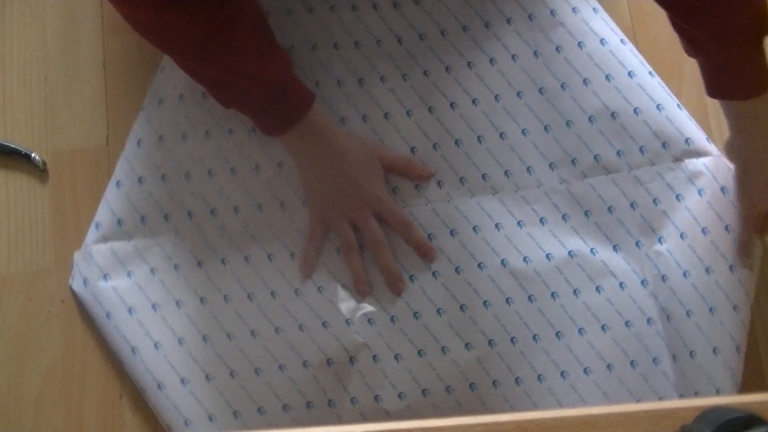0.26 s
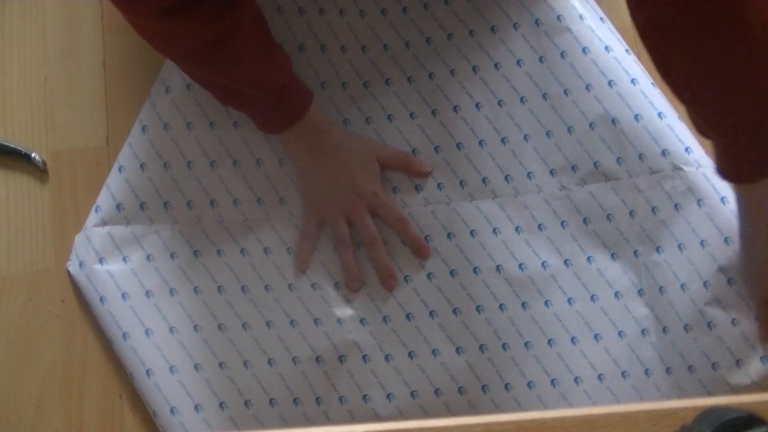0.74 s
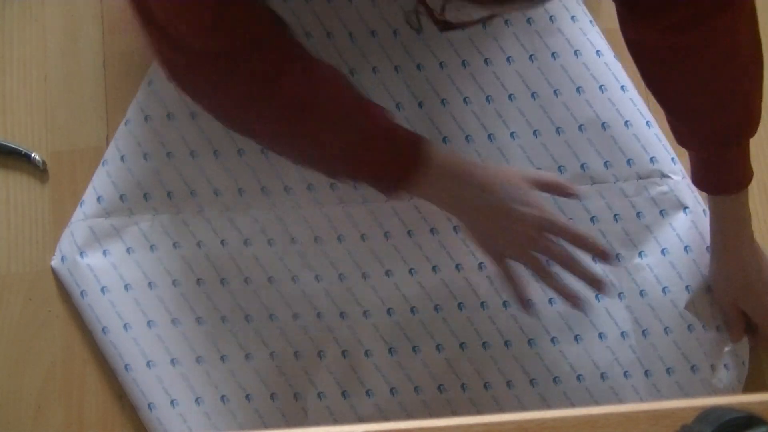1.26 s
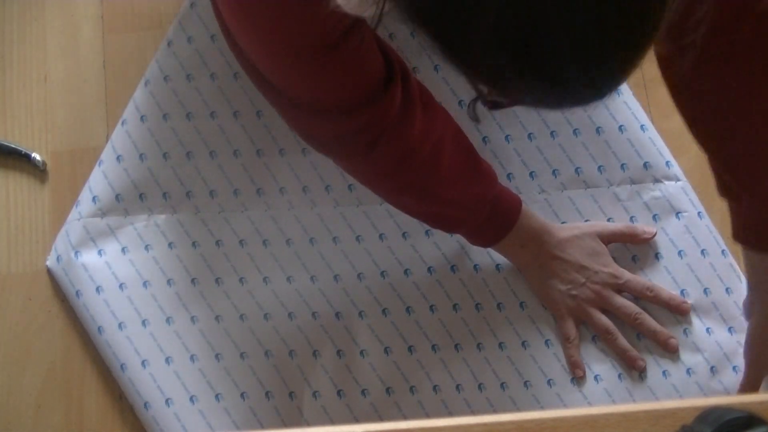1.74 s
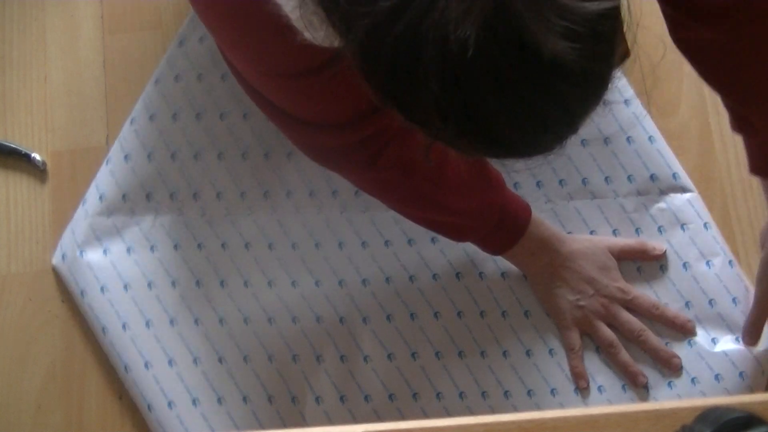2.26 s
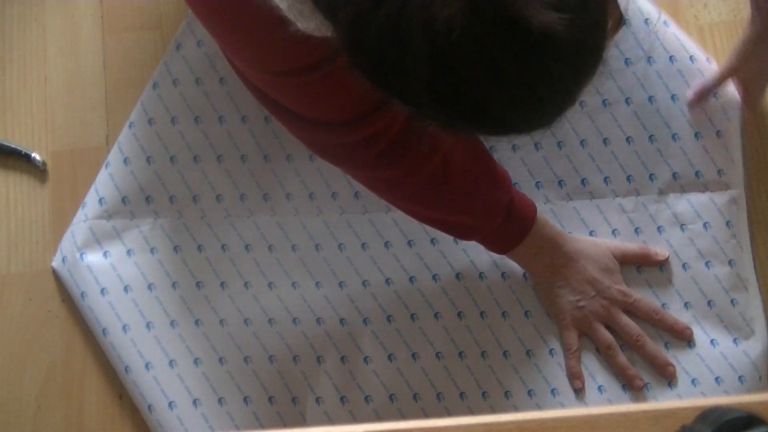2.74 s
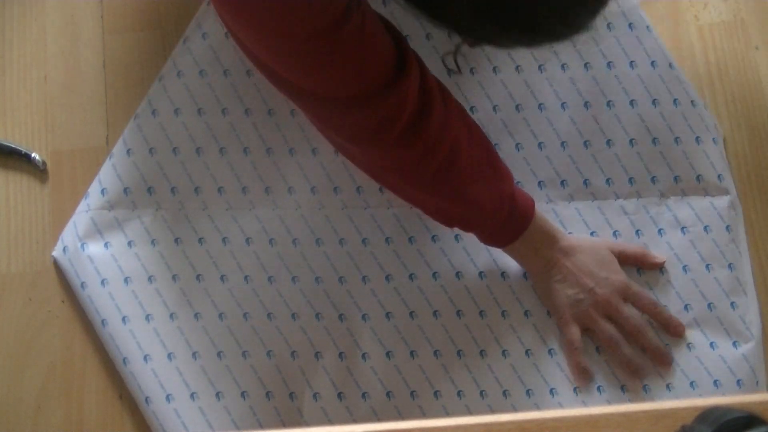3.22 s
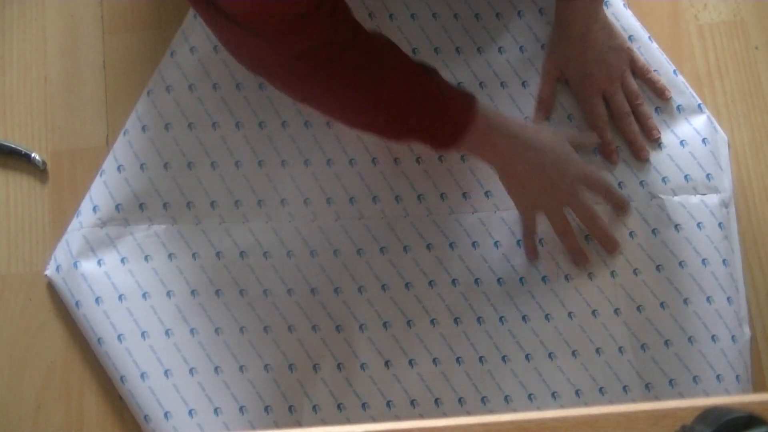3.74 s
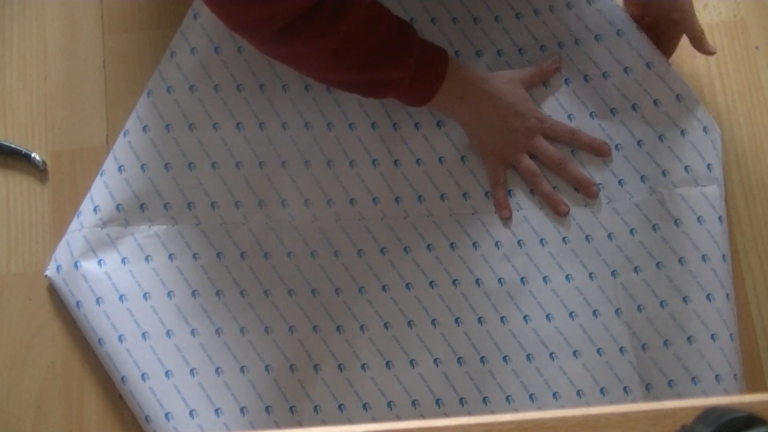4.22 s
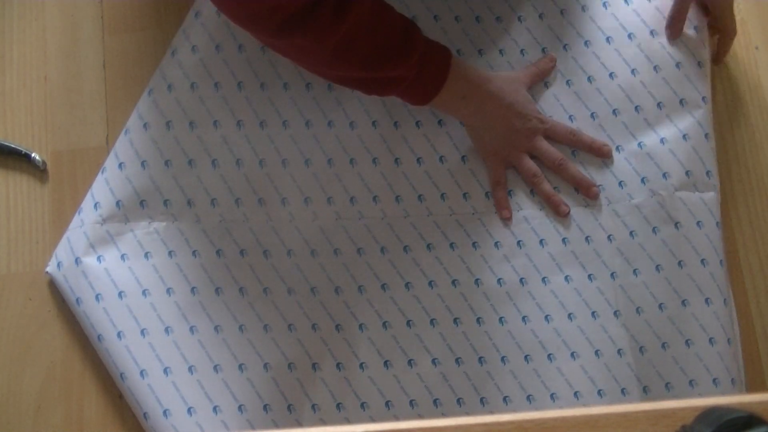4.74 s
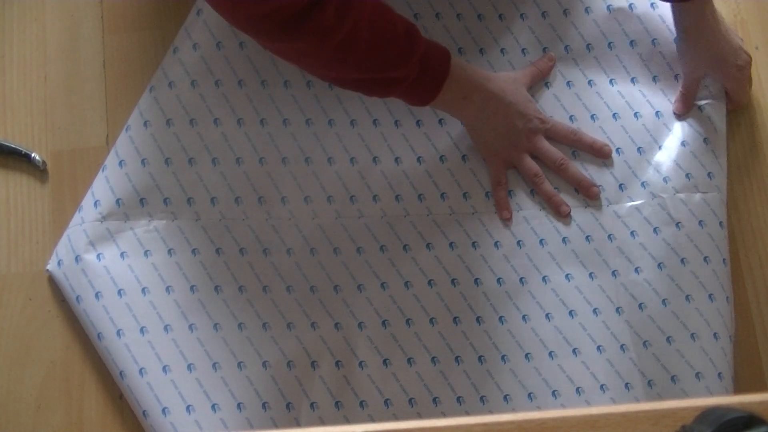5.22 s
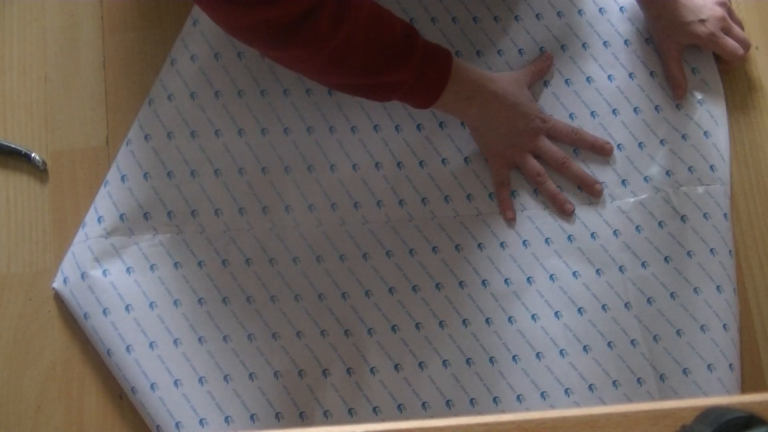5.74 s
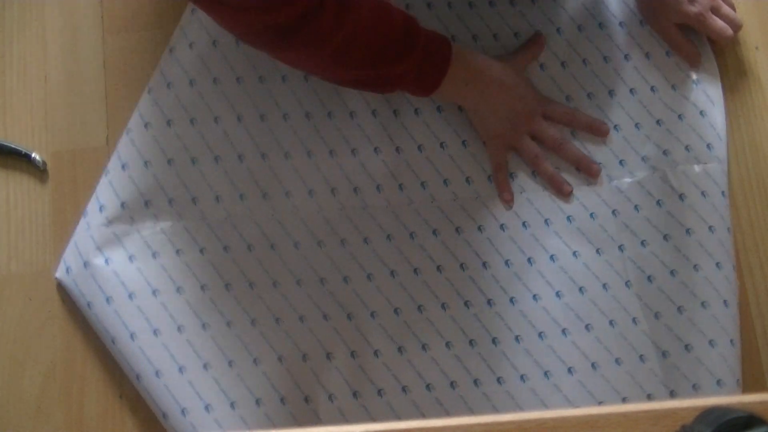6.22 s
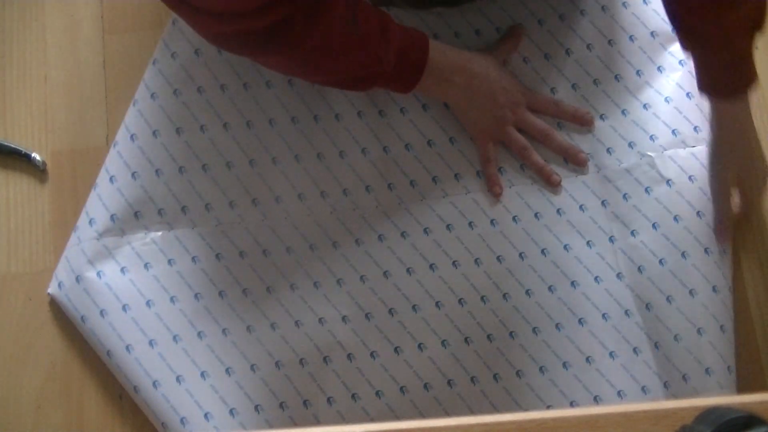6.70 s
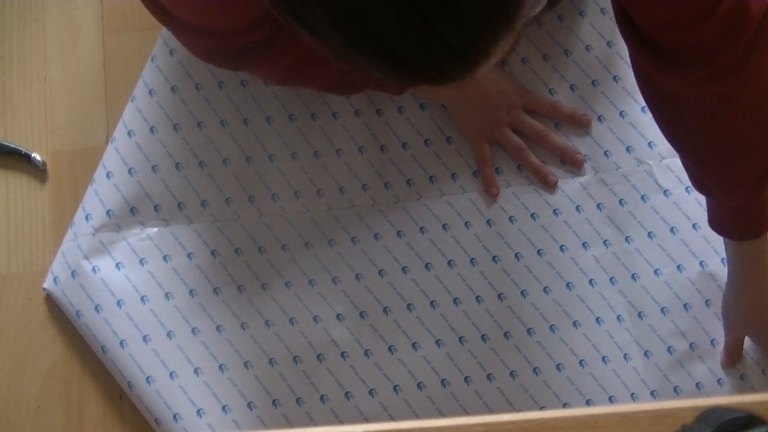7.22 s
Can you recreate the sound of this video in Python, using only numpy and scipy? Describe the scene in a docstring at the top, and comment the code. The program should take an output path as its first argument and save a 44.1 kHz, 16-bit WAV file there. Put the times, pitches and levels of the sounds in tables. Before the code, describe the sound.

Hands slide a large sheet of stiff paper over a wooden floor in uneven, hissing strokes. Creases snap and crackle, and palms pat it flat with hollow pops, the sharpest about three seconds in. A little later the edge rasps loudly over the floor with a brief honk of squeezed air. Near the end the floor thumps dully under more rustling. It is heard from nearby in a small, quiet room.

```python
"""A large sheet of stiff cover paper hisses as hands slide it over a wooden floor and fold it round a
canvas, in a small room. Its fibres catch and let go, creases snap and crackle, palms pat it flat with
hollow pops, and skin squeaks on it once. The edge rasps over the floor, once loudly, while air squeezed
from under the fold honks. Near the end, shifting weight makes the floor thump dully."""
import sys
import numpy as np
from scipy import signal
from scipy.fft import rfft, irfft, next_fast_len
from scipy.io import wavfile
from scipy.ndimage import uniform_filter1d

SR = 44100
rng = np.random.default_rng(int(sys.argv[2]) if len(sys.argv) > 2 else 0)


def generate_wav(signal):
    """Clip the signal to [-1, 1] and save it as 16-bit WAV at the path in sys.argv[1]."""
    frames = np.transpose(np.atleast_2d(signal))
    scaled = np.clip(frames, -1, 1) * 32767
    pcm = np.round(scaled).astype(np.int16)
    wavfile.write(sys.argv[1], SR, pcm)


N = 328986
PUSH_SHAPE = 1.39  # flanks of a push or heave: 1 pointed, 2 rounded
# Stereo width of the room. Each row: frequency in Hz, relative side level in dB.
ROOM_WIDTH = [(60, -2), (250, 4.5), (600, -6.5), (2000, -7.5), (4500, -10), (8000, -3.5), (12000, -0.5)]


def sliding(rub_gain, hiss_gain, flex_gain):
    """Fibres catch and let go; pressure adds fine hiss, bending a hollow body, and tiny wrinkles tick."""
    # Colours of the rub, the hiss and the flexing body. Each row: frequency in Hz, level in dB.
    rub_colour = [(700, -30.5), (1400, -14), (2200, -4), (3000, -3.5), (3800, 0.5), (5000, 3), (5700, -5),
                  (7000, -23), (9000, -30), (14000, -57)]
    hiss_colour = [(4000, -42), (6000, 3.5), (7500, -3), (9800, -5), (11000, -12), (13000, -21),
                   (15800, -26)]
    flex_colour = [(100, -41), (350, -9.5), (560, -13), (750, -2), (1050, 1.5), (1500, 0), (2200, -0.5),
                   (4000, -24)]
    rub = rub_gain * friction(rub_colour, per_s=3200, spread_db=5.5)
    hiss = hiss_gain * friction(hiss_colour, per_s=7000, spread_db=6)
    flex = flex_gain * friction(flex_colour, per_s=900, spread_db=4.5)
    wrinkles = signal.fftconvolve(slips(per_s=110, spread_db=4), crease_click(softness=1))[:N]
    ticks = rub_gain * amp(-13) * unit(in_room(wrinkles, wet_db=-2))
    return rub + hiss + flex + ticks


def hand_motion():
    """Gains of rub, hiss and flex: the pushes of the hands add up in power, over a faint creep."""
    # Pushes on the sheet. Each row: fastest moment, rise and fall in seconds, rub level in dB,
    # extra hiss from pressure in dB, extra body from bending in dB.
    pushes = [(.04, 0.15, 0.051, -39.5, -2.5, 0.5), (.18, 0.097, 0.044, -40, -2, 0),
              (.31, 0.037, 0.084, -37.5, -0.5, -0.5), (.465, 0.14, .15, -35.5, 0, -2),
              (.725, 0.14, 0.059, -40, 0.5, 3), (.93, 0.2, 0.098, -36, -5.5, 4),
              (1.05, 0.034, 0.036, -45.5, 1, 4), (1.42, 0.13, 0.12, -44.5, -4, 1.5),
              (1.528, 0.012, 0.047, -31, -1, 4), (1.89, .34, 0.098, -41, 5, -4.5),
              (2.08, 0.13, 0.08, -39.5, 2, -3), (2.325, 0.088, 0.085, -34.5, 5.5, 2),
              (2.699, 0.48, 0.45, -30.5, -0.5, -6), (2.97, 0.1, 0.043, -53, 17, -13),
              (3.25, 0.15, 0.079, -38, -2, 1), (3.465, 0.016, 0.12, -36, -2, 0.5),
              (3.6, 0.076, 0.035, -40, -4, 0), (3.88, 0.2, 0.14, -46, 2.5, -9),
              (4.03, 0.14, 0.085, -43, -1, 4), (4.2, 0.043, 0.063, -40.5, -0.5, 7.5),
              (4.336, 0.023, 0.059, -28.5, -2.5, -2.5), (4.725, 0.087, 0.049, -42.5, -3, 6),
              (4.96, .1, 0.1, -38, 2, -4), (5.075, 0.07, 0.11, -36, -0.5, -7),
              (5.4, 0.17, 0.19, -40.5, 0.5, 0), (5.755, 0.019, 0.056, -45.5, 3, -11),
              (5.895, 0.066, 0.068, -42, -1, 2), (6.025, 0.025, .04, -43, -10, 6.5),
              (6.125, 0.13, 0.063, -35.5, -1.5, -3), (6.33, 0.089, .17, -39.5, -6, -2.5),
              (6.65, 0.33, 0.26, -37.5, 0.5, 0), (6.85, 0.21, 0.25, -39.5, 3, -6.5),
              (7.1, 0.022, 0.042, -47.5, 6, 16), (7.22, 0.043, 0.12, -43, 3, -3)]
    # The hands hold the sheet still. Each row: centre in seconds, half length in seconds.
    rests = [(3.82, 0.076), (5.723, 0.45), (7.42, 0.14)]
    hiss_db, flex_db = -10.5, -7  # against the rub
    flex_linger = 1.2  # bending dies away more slowly than sliding
    creep = 1 - sum(swell(at, half, half, shape=1) for at, half in rests)
    rub, hiss, flex = np.outer(amp([-57.5, -68, -50]), creep) ** 2
    for at, rise, fall, db, pressure_db, bend_db in pushes:
        speed = amp(db) * swell(at, rise, fall, PUSH_SHAPE)
        bend = amp(db + flex_db + bend_db) * swell(at, rise, fall * flex_linger, PUSH_SHAPE)
        rub += speed ** 2
        hiss += (amp(hiss_db + pressure_db) * speed) ** 2
        flex += bend ** 2
    return np.sqrt([rub, hiss, flex])


def billowing(flex_gain):
    """Soft flaps of the sheet: in a bending wave the highs arrive first, so each flap sweeps down."""
    # The whole sheet heaves. Each row: strongest moment, rise and fall in seconds, level in dB.
    heaves = [(.18, 0.065, 0.091, -46), (1.42, 0.026, 0.057, -48), (2.22, .22, 0.34, -51),
              (3.51, 0.097, 0.14, -48), (4.08, .06, 0.042, -56), (4.5, 0.12, .06, -44.5),
              (6.08, 0.12, 0.12, -53.5), (6.5, 0.061, 0.081, -51)]
    # Colour of the swaying sheet. Each row: frequency in Hz, level in dB.
    sway_colour = [(20, -50), (45, -22), (70, -25), (105, -1.5), (170, -10.5), (300, -7.5), (480, -3.5),
                   (800, 7.5), (2000, -53)]
    t = np.arange(SR // 25) / SR
    sweep_hz = 90 + 650 * np.exp(-t / 0.00482)
    flap = np.sin(2 * np.pi * np.cumsum(sweep_hz) / SR) * np.exp(-t / 0.012)
    flaps = signal.fftconvolve(slips(per_s=90, spread_db=8), flap)[:N]
    heaving = sum(amp(db) * swell(at, rise, fall, PUSH_SHAPE) for at, rise, fall, db in heaves)
    bending = amp(-59) * unit(flex_gain) ** 0.48  # grows 0.48 dB for each dB of flex
    return np.hypot(bending, heaving) * unit(in_room(coloured(flaps, sway_colour), wet_db=0.5))


def edge_scraping():
    """The edge of the sheet rasps as it is dragged over the floor."""
    # Drags of the edge. Each row: fastest moment, rise and fall in seconds, level in dB.
    drags = [(4.344, 0.084, 0.028, -43.5), (4.524, 0.05, .054, -19.5), (5.2, 0.13, 0.17, -48.5),
             (5.567, 0.045, 0.041, -35)]
    # Colour of the rasp. Each row: frequency in Hz, level in dB.
    rasp_colour = [(60, -29), (300, -22), (520, 0), (650, -1.5), (1200, 7), (2300, 5), (3000, -3),
                   (3700, 2.5), (5100, 4.5), (6200, -6), (8000, -19), (10500, -18.5), (15800, -36)]
    speed = sum(amp(db) * swell(at, rise, fall, shape=1.18) for at, rise, fall, db in drags)
    return speed * friction(rasp_colour, per_s=2200, spread_db=4)


def pocket_honks(width_hz=165):
    """Air squeezed from under a fold honks: uneven slips drive one resonance of each pocket."""
    # Air pockets. Each row: strongest moment, rise and fall in seconds, level in dB, resonance in Hz.
    pockets = [(4.335, 0.018, 0.09, -38.5, 1207), (4.425, 0.0092, 0.013, -41, 767),
               (4.494, 0.025, .017, -26, 790), (4.533, 0.011, 0.015, -12.5, 1219),
               (4.57, 0.061, 0.021, -26, 1338), (5.07, 0.21, .11, -50.5, 871),
               (6.59, 0.018, .05, -41.5, 801), (6.78, 0.18, 0.38, -55.5, 808),
               (7.016, 0.029, 0.035, -42.5, 850), (7.115, 0.013, 0.019, -37, 850)]
    lowpass = signal.butter(3, width_hz / 2, fs=SR, output="sos")
    honks, t = np.zeros(N), np.arange(N) / SR
    for at, rise, fall, db, hz in pockets:
        drive = slips(per_s=800, spread_db=1) + 1j * slips(per_s=1100, spread_db=7)
        wobble = signal.sosfilt(lowpass, drive)
        tone = unit(np.real(wobble * np.exp(2j * np.pi * hz * t)))
        honks += amp(db) * swell(at, rise, fall, shape=1.3) * tone
    return in_room(honks, wet_db=-12)


def crease_snaps():
    """A crease flips in a burst of clicks and sets off a dying crackle; a hard flip shoves the air."""
    # Snapping creases. Each row: start in seconds, level in dB, crackle trim in dB, softness (0 is hard).
    snaps = [(0.202, -22.5, -7, 0.77), (0.7023, -24, -5, 1.2), (.859, -16.5, -13, 1.5),
             (0.9364, -15.5, -25, 1.1), (1.522, -25, -4, 0.95), (2.19, -27.5, -0.5, 0.78),
             (3.046, -23.5, 6, 1.4), (3.0613, 0, -10.5, 0.022), (3.449, -15, -28, 1.26),
             (3.4802, -26.5, -18, 1.07), (3.8916, -34, -5, 0.67), (4.1019, -31, 2, 0),
             (4.191, -25, -5, 1.2), (4.489, -11, -13, 0.81), (4.6581, -16.5, -16, 1.15),
             (4.6754, -10.5, -18, 0.4), (4.7509, -24, -24, 0.68), (5.3688, -32.5, 0, 1.6),
             (5.888, -27.5, -3, 1.5), (6.1378, -20, -17, 0.79), (6.846, -22, -7.5, 1.5),
             (7.009, -26, -2, 1.6), (7.093, -22, -11.5, 1.2)]
    out, t = np.zeros((2, N)), np.arange(SR // 4) / SR
    push, rebound = (t / peak_s * np.exp(1 - t / peak_s) for peak_s in (0.00025, 0.00075))
    shove = push - rebound / 3
    for at, db, crackle_db, softness in snaps:
        softness = min(softness, 1.3)
        flip_s = 0.0012 - softness * 0.0008
        burst = slips(per_s=SR, spread_db=11.5, size=len(t)) * (t < flip_s)
        flip = signal.fftconvolve(burst, crease_click(softness))[:len(t)]
        settling = slips(per_s=2400, spread_db=8, size=len(t))
        crackle = unit(signal.fftconvolve(settling, crease_click(softness * 0.63 + 0.25))[:len(t)])
        t60 = 0.094 * 2 ** (db / 42)  # louder snaps crackle longer
        envelope = amp(crackle_db - 3 - 60 * t / t60) * (1 - np.exp(-t / 0.00083))
        snap = flip / np.abs(flip).max() + envelope * crackle
        add(out, at, in_room(amp(db) * snap, wet_db=-1))
        add(out, at, amp(db - 17 - 40 * softness) * shove)
    return out


def crease_click(softness):
    """The click of one crease; soft ones keep mostly the colour around 4 kHz."""
    # Colour of a hard crease. Each row: frequency in Hz, level in dB.
    crease_colour = [(20, -28), (90, -15), (300, -19), (800, -4.5), (1500, -3), (2500, 4.5), (3050, -2),
                     (3800, 6.5), (5000, 4), (5600, -4.5), (7500, -10.5), (10000, -17), (12000, -18),
                     (15800, -35)]
    return click([(hz, db - 5 * softness * (abs(np.log2(hz / 4000)) + (hz > 8000)))
                  for hz, db in crease_colour])


def palm_pats():
    """A bulge collapses with a hollow pop, then flutters against the floor."""
    # Pats and pops. Each row: start in seconds, level in dB, pitch in Hz, flutter t60 in seconds.
    pats = [(.174, -30, 840, 0.1), (0.2013, -23, 430, 0.22), (0.202, -19, 1110, 0.17),
            (.263, -26.5, 690, 0.1), (.7214, -28.5, 760, 0.15), (.778, -42, 250, 0.34),
            (1.521, -31, 1100, 0.056), (3.0586, -15, 1050, .05), (3.0622, -7, 1250, 0.27),
            (3.17, -29.5, 570, 0.2), (3.4466, -22, 580, 0.26), (3.479, -26, 760, 0.22),
            (3.9635, -34, 795, 0.093), (4.048, -44, 249, 0.35), (4.647, -29.5, 790, 0.053),
            (5.0623, -24.5, 895, 0.084), (5.3698, -23, 700, 0.11), (6.24, -35.5, 340, 0.15),
            (7.0909, -25, 875, 0.064), (7.203, -30, 1070, 0.091)]
    # Colour of a pop. Each row: multiple of its pitch, level in dB.
    pop_colour = [(.06, -28), (.25, -21), (.55, -8), (1, 4.5), (1.9, -5.5), (5, -13.5), (20, -57)]
    out, t = np.zeros((2, N)), np.arange(SR // 4) / SR
    for at, db, pitch_hz, t60 in pats:
        pop = click([(pitch_hz * ratio, level) for ratio, level in pop_colour], size=2048)
        contacts = slips(per_s=1100, spread_db=5.5, size=len(t))
        flutter = unit(signal.fftconvolve(contacts, pop)[:len(t)])
        pat = amp(-11.5 - 60 * t / t60) * flutter
        add(pat, 0, pop)
        add(out, at, in_room(amp(db) * pat, wet_db=-5))
    return out


def skin_squeak(at=1.937, db=-38, pitch_hz=1450, rise_s=0.007):
    """Skin sticks on the coated paper and gives one tiny falling chirp."""
    out, t = np.zeros((2, N)), np.arange(SR // 20) / SR
    chirp = np.sin(2 * np.pi * pitch_hz * t * (1 - 0.93 * t))
    envelope = (t / rise_s) ** 2 * np.exp(2 - 2 * t / rise_s)
    add(out, at, in_room(amp(db) * envelope * chirp, wet_db=-13))
    return out


def floor_thumps():
    """Shifting weight sets the low modes of the wooden floor booming."""
    # Weight landing. Each row: start in seconds, level in dB, upper-mode gain in dB, rise in seconds.
    landings = [(0.228, -66.5, 27.5, 0.01), (3.52, -58.5, 5, 0.014), (4.299, -67.5, 21.5, 0.01),
                (5.578, -50, -7, 0.046), (6.242, -38, -3.5, 0.0079), (6.265, -30.5, 4, 0.0089)]
    # Floor modes, lowest first. Each row: frequency in Hz, level in dB, t60 in seconds.
    floor_modes = [(47.1, -3, 0.84), (99.2, -3.5, 0.36), (120.5, 8, 0.081), (155.4, -3.5, 0.29),
                   (230, 4, 0.073), (390, -17.5, .2)]
    out, t = np.zeros(N), np.arange(SR) / SR
    for at, db, upper_db, rise in landings:
        ring = sum(amp(mode_db + upper_db * (k > 0) - 60 * t / t60) * np.sin(2 * np.pi * hz * t)
                   for k, (hz, mode_db, t60) in enumerate(floor_modes))
        add(out, at, amp(db) * ring * (1 - np.exp(-t / rise)))
    return out


def in_room(x, wet_db, size=16384):
    """A sound from one spot on the sheet: direct path plus a fresh stereo tail from floor and walls."""
    # Decay of the room. Each row: frequency in Hz, t60 in seconds.
    room_decay = [(100, 0.1), (600, 0.26), (3000, 0.38), (6000, 0.32), (14000, 0.12)]
    hz, t, tail = signal.stft(rng.standard_normal((2, size)), SR, nperseg=256)
    tail *= amp(-60 * t / along(room_decay, hz)[:, None]) * (1 - np.exp(-t / 0.003))
    tail *= (hz / np.hypot(hz, 300))[:, None]  # a thin sheet sends little bass into the room
    tail[1] *= amp(along(ROOM_WIDTH, hz) + 2)[:, None]
    mid, side = signal.istft(tail, SR, nperseg=256)[1]
    paths = amp(wet_db) * np.array([mid + side, mid - side]) / np.linalg.norm(mid)
    paths[:, 0] += 1  # direct path
    return signal.fftconvolve(x[None], paths, axes=1)[:, :N]


def room_air():
    """A quiet, steady bed of stereo room tone."""
    # Colour of the room tone. Each row: frequency in Hz, level in dB.
    air_colour = [(15, -40), (30, -8), (50, -15), (110, -10.5), (300, -8.5), (1000, -11), (4500, -5.5),
                  (7000, -20), (10000, -23.5), (12000, -29), (15800, -35)]
    mid, side = coloured(rng.standard_normal((2, N)), air_colour)
    side = amp(3) * coloured(side, ROOM_WIDTH)
    return amp(-55) * unit(np.array([mid + side, mid - side]))


def friction(colour, per_s, spread_db, spots=3):
    """Steady slipping at several spots of the sheet; rms 1."""
    slipping = sum(in_room(slips(per_s / spots, spread_db), wet_db=2.5) for _ in range(spots))
    return unit(shifting_colour(coloured(slipping, colour), depth_db=1.5))


def slips(per_s, spread_db, size=N):
    """Tiny stick-slip impulses at random times and of uneven strength; rms 1."""
    happens = rng.random(size) < per_s / SR
    strength = amp(spread_db * np.clip(rng.standard_normal(size), -2, 2))
    return unit(happens * strength * rng.choice([-1, 1], size))


def shifting_colour(x, depth_db):
    """The colour drifts at random as the sheet changes shape."""
    spectra = signal.stft(x, nperseg=512)[2]
    drift = uniform_filter1d(rng.standard_normal(spectra.shape[-2:]), size=8, axis=0)  # over frequency
    drift = uniform_filter1d(drift, size=12, axis=1)  # over time
    return signal.istft(spectra * amp(depth_db * unit(drift)), nperseg=512)[1][..., :N]


def swell(at, rise, fall, shape):
    """Gain of one movement: 1 at its peak, 10 dB less a rise earlier and a fall later."""
    start = max(at - 6 * rise, 0)
    t = np.arange(start - at, 6 * fall, 1 / SR)
    gain = np.zeros(N)
    add(gain, start, amp(-10 * np.maximum(-t / rise, t / fall) ** shape))
    return gain


def click(colour, size=512):
    """The sharpest causal pulse with this colour; peak 1."""
    magnitude = amp(along(colour, np.fft.rfftfreq(size, 1 / SR)))
    cepstrum = irfft(np.log(magnitude))
    cepstrum[1:size // 2] *= 2  # fold to minimum phase
    cepstrum[size // 2 + 1:] = 0
    pulse = irfft(np.exp(rfft(cepstrum)))
    return pulse / np.abs(pulse).max()


def coloured(x, colour):
    """Equalise x with a curve of (Hz, dB) points."""
    return filtered(x, lambda hz: amp(along(colour, hz)))


def filtered(x, response):
    """Filter x with a gain given as a function of Hz."""
    size = next_fast_len(x.shape[-1] + SR // 8, real=True)
    return irfft(rfft(x, size) * response(np.fft.rfftfreq(size, 1 / SR)), size)[..., :x.shape[-1]]


def along(points, hz):
    """Interpolate (Hz, value) points on a log frequency axis."""
    point_hz, values = np.transpose(points)
    return np.interp(np.log(hz + 1), np.log(point_hz + 1), values)


def add(track, at, sound):
    """Mix a sound into a track at a time in seconds."""
    part = track[..., round(at * SR):][..., :sound.shape[-1]]
    part += sound[..., :part.shape[-1]]


def amp(db):
    """Decibels to gain."""
    return 10 ** (np.asarray(db) / 20)


def unit(x):
    """Scale to rms 1."""
    return x / np.sqrt(np.mean(x ** 2) + 1e-20)


def scene():
    """Paper, floor and room air, each band leaning a little to one side."""
    # Stereo balance. Each row: frequency in Hz, left minus right in dB.
    balance = [(60, 7), (110, 2.5), (200, -0.5), (380, 3.5), (700, 3), (1290, 1.0), (2380, -1.5),
               (4400, -1.5), (8120, 0), (15000, -2.5)]
    rub_gain, hiss_gain, flex_gain = hand_motion()
    paper = sliding(rub_gain, hiss_gain, flex_gain) + billowing(flex_gain)
    paper += edge_scraping() + pocket_honks() + crease_snaps() + palm_pats() + skin_squeak()
    mix = paper + floor_thumps() + room_air()
    return filtered(mix, lambda hz: amp(np.outer([1, -1], along(balance, hz)) / 2))


def record(dry, low_hz=36, top_hz=15800):
    """Shed the deepest bass, clip peaks at full scale and cut the highest treble."""
    thinned = signal.sosfilt(signal.butter(3, low_hz, "high", fs=SR, output="sos"), dry)
    return filtered(np.clip(thinned, -1, 1), lambda hz: hz < top_hz)


dry = scene()
out = record(dry)
generate_wav(out)
```